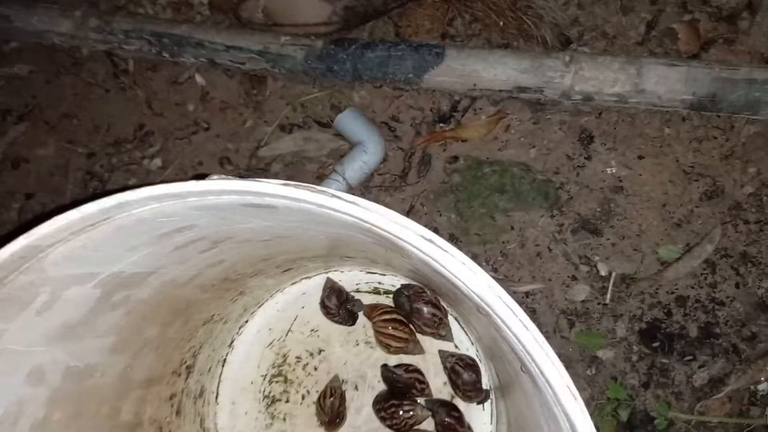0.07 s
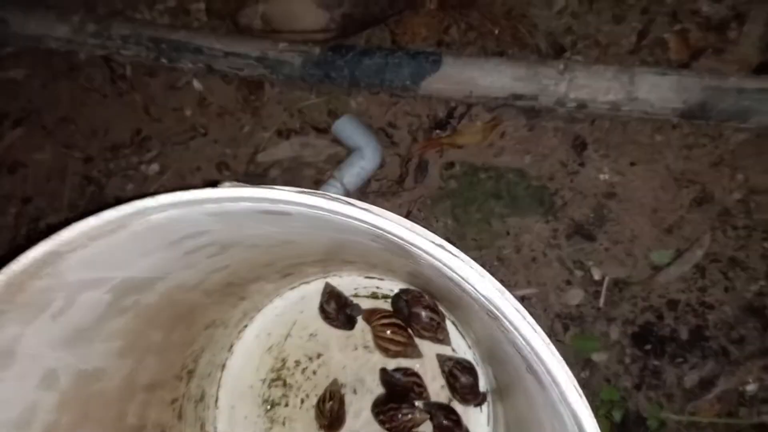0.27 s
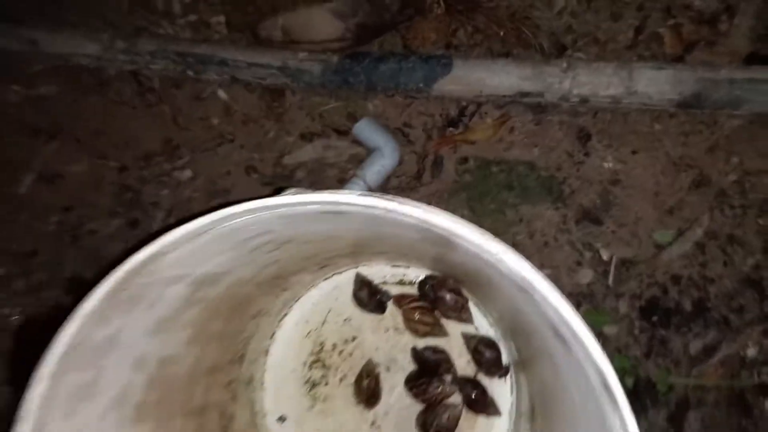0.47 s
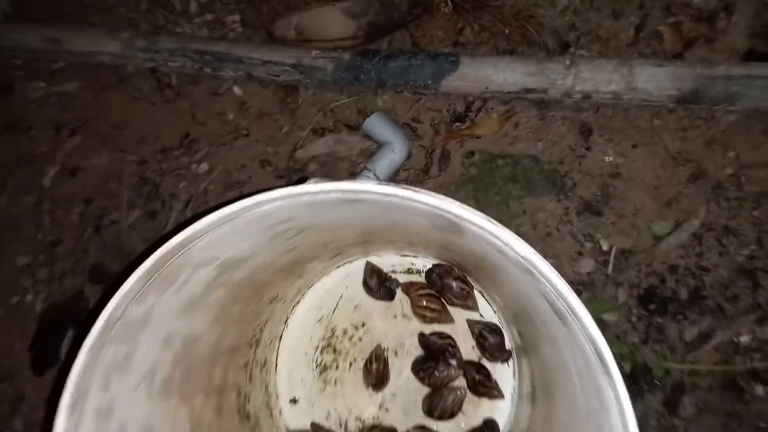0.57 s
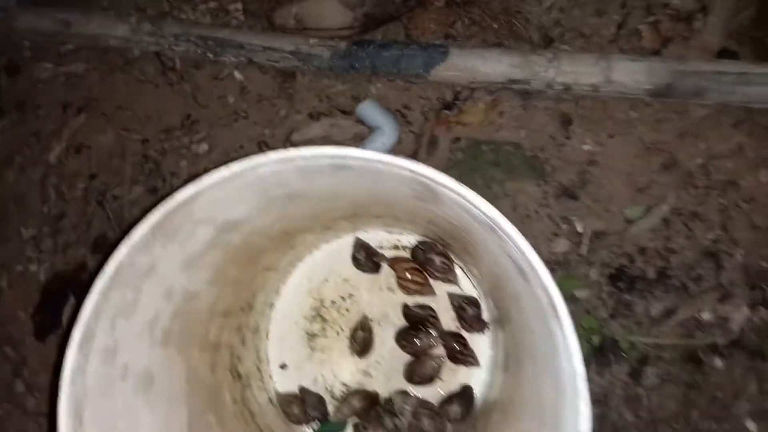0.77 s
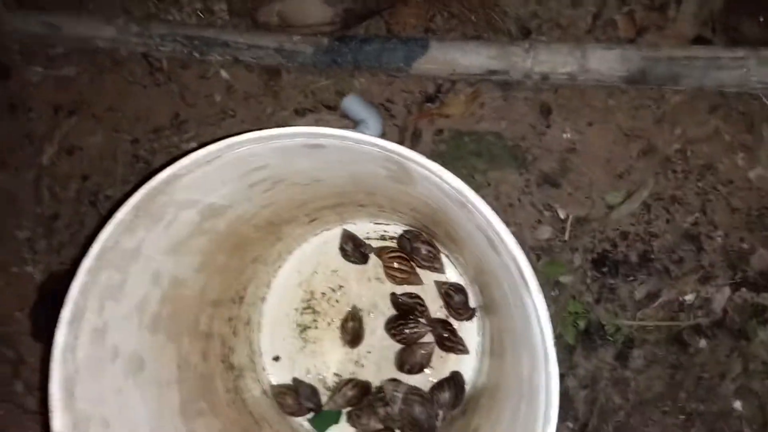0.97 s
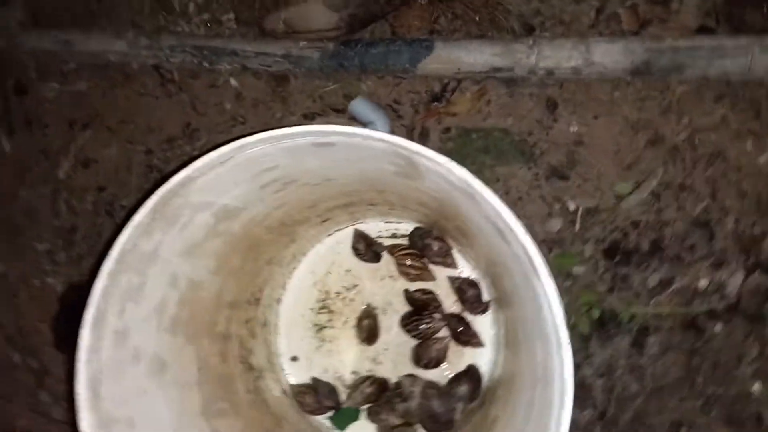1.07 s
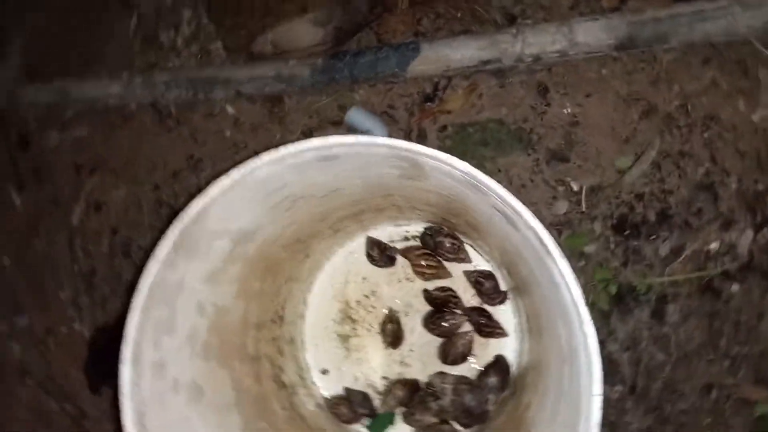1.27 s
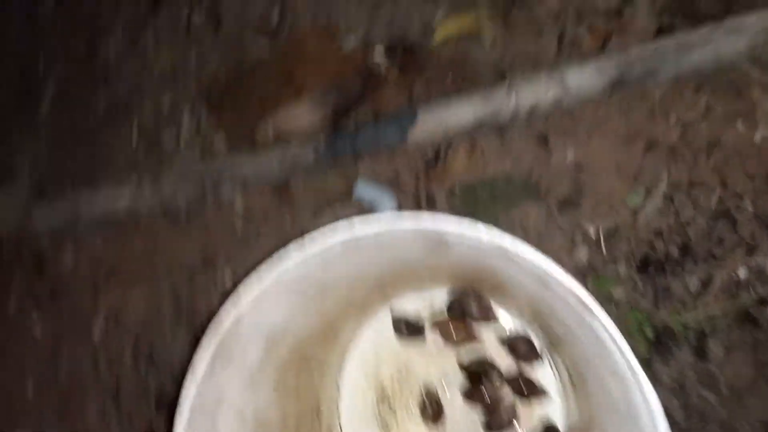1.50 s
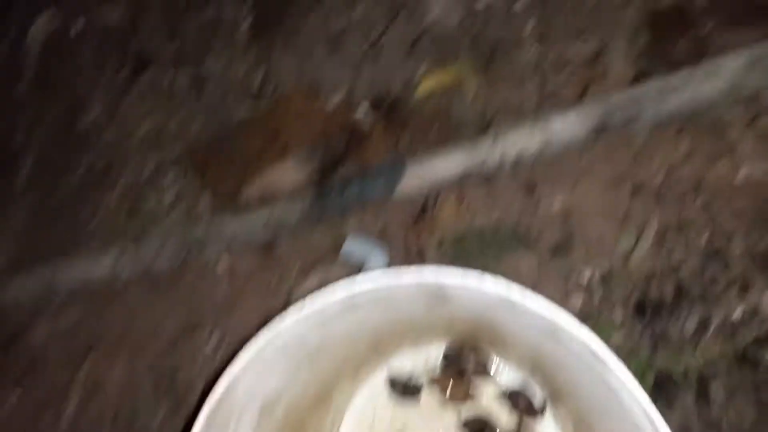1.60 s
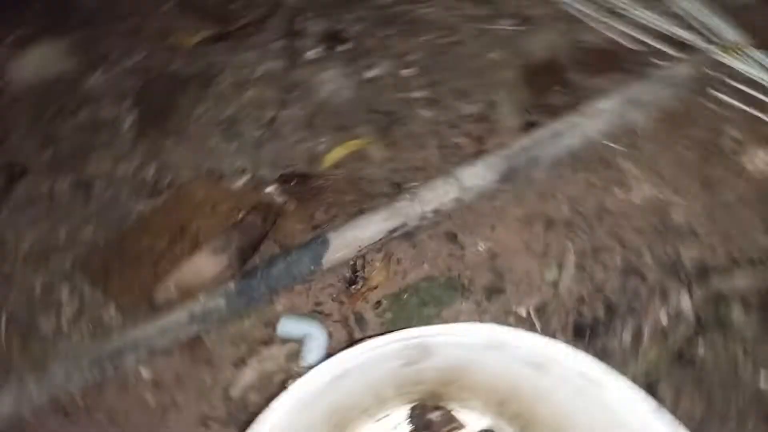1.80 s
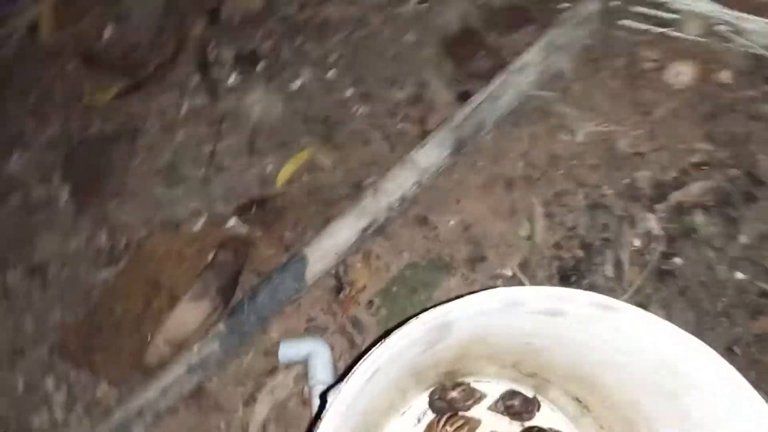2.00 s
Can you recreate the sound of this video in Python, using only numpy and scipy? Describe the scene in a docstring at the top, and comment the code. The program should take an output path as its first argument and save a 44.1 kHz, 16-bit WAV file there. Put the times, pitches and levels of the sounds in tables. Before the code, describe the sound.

Quiet garden at night with high crickets and faint hiss; early on a hard shell knocks and rebounds inside a hollow plastic bucket, loud and close, followed by small clicks and light scuffs of feet on soil.

```python
"""A garden at night: crickets of several kinds, wings rung by strokes, chirp and trill all through over
hiss and a faint low rumble. Feet scuff the soil at the start, under very faint low booms. Then a snail
shell drops into a plastic bucket and bounces: noise rings the wall in clacks and the air inside booms
as swelling, dying sines. Further scuffs of feet and shells follow to the end, with small ticks of
shells and twigs, dying puffs of noise, among them."""
import sys
import numpy as np
from scipy import signal
from scipy.fft import rfft, irfft
from scipy.io import wavfile
from scipy.ndimage import uniform_filter1d

SR = 44100
rng = np.random.default_rng(int(sys.argv[2]) if len(sys.argv) > 2 else 0)


def volts_from_db(level):
    """Convert decibel levels to linear amplitude ratios."""
    exponent = np.asarray(level, float) / 20
    return 10 ** exponent


def transcribe(u):
    """Save the signal u as a 16-bit wav file named by the first command-line argument.

    u: samples, shape (n,) or (channels, n), limited to [-1, 1]; the rate is SR.
    q: integer samples, one column per channel.
    """
    v = np.clip(np.atleast_2d(u).T, -1, 1)
    q = np.round(v * 32767).astype(np.int16)
    wavfile.write(sys.argv[1], SR, q)


N = 90404  # length in samples

# In every table pan is left over right.
# Shell meets bucket wall: t/s, wall level/dB, crack level/dB, shell ring f/Hz, shell level/dB,
# chatter decay/s, pan/dB
BOUNCES = [(.2328, -15, -23.5, 1840, -14.5, 0.0066, -2.5), (.2375, -17.5, -27, 900, -19, 0.0039, -2.5),
           (.2785, -16, -45, 2000, -31.5, 0.0033, -3), (.3397, -10.5, -22.5, 2980, -15.5, 0.003, -2),
           (.3802, -11, -27.5, 2220, -7, 0.0022, -4.5), (.4064, -21.5, -42, 1670, -18.5, 0.002, 1.5),
           (.4532, -32.5, -37, 900, -32, 0.0016, -2.5), (0.464, -37, -53.5, 2100, -42, 0.0023, -8)]
# Crowded wall modes by band: f/Hz, level/dB relative to the blow, t60/s
WALL_MODES = [(400, -21.5, 0.24), (657.5, -4, 0.1), (900, 1, .09), (1250, -6, 0.099), (1600, -3, 0.094),
              (2100, 0.5, 0.078), (2454, -2, 0.057), (3300, -2, 0.055), (4280, -18, 0.019),
              (5800, -25.5, .02), (7500, -21, 0.028), (9300, -17, .012), (12000, -23, .012),
              (14500, -21, .012)]
# Low booms of the air column: t/s, level/dB before a common lift, f/Hz
BOOMS = [(.002, -47, 219), (.05, -55, 217), (0.089, -60, 220), (.2332, -9, 207), (0.2782, -20, 224),
         (0.3375, -24.5, 207), (0.379, -11.5, 217.7), (0.4044, -24.5, 212.3), (.453, -42, 210),
         (0.468, -50.5, 218), (0.492, -40.5, 226.6), (0.521, -48, 216), (.575, -60.5, 220)]
# Small ticks of shells and twigs: t/s, starting level/dB, f/Hz, width/share of f, t60/s, pan/dB
TICKS = [(1.1074, -39.5, 2500, 0.095, 0.026, -12), (1.110, -37.5, 2537, 0.48, 0.0073, -17),
         (1.109, -37.5, 7920, 0.36, .006, 2.5), (1.137, -44, 4500, 1, 0.0057, -4),
         (1.121, -41.5, 2000, 0.61, 0.014, -11), (1.130, -47, 2200, .3, 0.017, -15),
         (1.136, -29.5, 1600, 0.39, 0.011, -7.5), (1.142, -53.5, 1526, 0.46, 0.07, -4),
         (.533, -30.5, 8500, 0.091, 0.0165, 11), (0.532, -46, 1400, 0.53, 0.14, -4.5),
         (0.538, -36.5, 5700, 0.74, 0.047, -3), (0.549, -41.5, 8100, 0.57, 0.045, 5),
         (1.838, -35, 10850, 0.51, 0.0051, 1), (2.02, -44, 4340, 0.083, 0.027, 0.5)]
# Scuffs of feet and shells: start t/s, length/s, level/dB, centre f/Hz, width/octaves, pan/dB
SCUFFS = [(-.02, 0.16, -57, 1600, 1.95, -4.5), (0.433, 0.084, -50, 1210, 3.6, -5),
          (0.528, 0.053, -55.5, 1600, 2.5, 5), (0.621, .07, -66, 9030, 0.67, 7),
          (.772, 0.05, -51, 2260, 0.24, -12.5), (0.791, 0.097, -49, 3300, 0.32, -6.5),
          (0.777, 0.14, -60.5, 1896, 1.44, -7), (0.811, 0.079, -60.5, 13240, 0.45, 2),
          (0.833, 0.042, -57, 1450, 0.95, -8), (0.829, 0.045, -65, 230, 0.52, 1),
          (0.87, 0.13, -64.5, 2190, .9, -13), (1.025, 0.12, -60, 2580, 1.15, -10),
          (1.68, 0.17, -60.5, 2000, 1.15, -6.5), (1.803, 0.18, -56.5, 2547, 1.16, -7),
          (1.68, 0.39, -65, 11000, 1.02, 0.7), (1.803, .14, -65, 140, 1.47, 2.5)]
# Cricket choirs: low f/Hz, high f/Hz, level/dB, nominal chirp depth/dB, pan/dB,
# nominal wing pulses/per s, wing ring t60/cycles
CHOIRS = [(2037, 2280, -66, -1, -12, 95, 30), (3805, 4400, -57.5, 6, -3, 72, 200),
          (4694, 5160, -53.5, 9, 2.5, 110, 220), (6690, 7250, -59.5, 0, 5, 112, 170),
          (7270, 7850, -61, 15, 0.5, 46, 150)]
# Chirping of each choir, in the same order: chirps/per s, t/s of one chirp peak
CHIRPS = [(4.5, .9), (4.52, .78), (4.42, .918), (4.5, .8), (9.05, .874)]
# Shared gain of all choirs as the listener turns: t/s, level/dB
CHOIR_GAIN = [(0, 2), (.12, 5), (.17, 0.5), (.4, 0.9), (.8, -1.5), (1.1, -2.5), (1.45, -3), (1.6, -1.5),
              (1.85, 2.5), (2.05, 1)]
# Colour of the night hiss: f/Hz, relative level/dB
HISS_COLOUR = [(30, -23), (55, -10.5), (100, -8.5), (214, -9), (410, -22.5), (1730, -28.5), (2300, -17),
               (3140, -13), (4500, -11), (5300, -20), (5600, -19.5), (6300, -15.5), (8300, -13),
               (9500, -18), (11900, -28), (15500, -21), (16600, -30)]
# Treble of the hiss, used relative to its mean: t/s, level/dB
HISS_TREBLE = [(0.0, -66), (0.12, -67.5), (0.3, -68), (0.4, -60), (0.47, -62.5), (0.64, -68.5),
               (1.21, -75.5), (1.4, -77), (1.53, -70), (1.83, -68), (1.96, -74.5), (2.05, -73)]
# Low rumble: t/s, level/dB before a small trim
RUMBLE_LEVEL = [(0, -55.5), (.12, -71), (.2, -68), (.4, -56.5), (.6, -68.5), (1.0, -77), (1.5, -76),
                (1.85, -77), (2.05, -65.5)]


def rms_one(x):
    """Scale to rms 1."""
    return x / np.sqrt(np.mean(x ** 2) + 1e-20)


def curve(rows):
    """Join (t/s, value) rows by straight lines."""
    return np.interp(np.arange(N) / SR, *np.transpose(rows))


def ring(clicks, hz, t60):
    """A resonator: a unit click sets a dying sine of height about 1 ringing."""
    r, w = volts_from_db(-60 / (t60 * SR)), 2 * np.pi * hz / SR
    return signal.lfilter([0, np.sin(w)], [1, -2 * r * np.cos(w), r * r], clicks + 1e-18)


def band(x, low, high):
    """Band-pass between two frequencies in Hz."""
    return signal.sosfilt(signal.butter(2, [low, high], "band", fs=SR, output="sos"), x)


def grains(per_s, spread_db, shape):
    """Random clicks of uneven size and sign."""
    size_db = spread_db * np.minimum(rng.exponential(1, shape), 4)
    sizes = volts_from_db(size_db) * rng.choice([-1, 1], shape)
    return sizes * (rng.random(shape) < per_s / SR)


def stereo(pair, alike, pan_db):
    """Mix a shared and an opposed signal to left and right, then pan."""
    shared = np.sqrt(1 + alike) * pair[0]
    opposed = np.sqrt(1 - alike) * pair[1] * [[1], [-1]]
    return (shared + opposed) * volts_from_db(np.array([[pan_db / 2], [-pan_db / 2]]))


def clacks():
    """Each bounce cracks and chatters: the shell rings briefly, the wall's modes die band by band."""
    crack_decay_s, shell_width = 0.00087, 0.18  # width as share of pitch
    tail_db, alike = -9, 0.24  # the wall's ringing tail against the chatter; likeness of the sides
    out, u = np.zeros((2, N)), np.arange(int(.2 * SR)) / SR
    for s, wall_db, crack_db, shell_hz, shell_db, chatter_s, pan_db in BOUNCES:
        start = int(s * SR)
        here = out[:, start:start + len(u)]  # a view: adding here adds to out
        chatter = rms_one(grains(5400, 1.7, (2, len(u)))) * np.exp(-u / chatter_s)
        noises = rng.standard_normal((2, 2, len(u)))

        crack = band(noises[0] * np.exp(-u / crack_decay_s), 900, 15000)
        here += volts_from_db(crack_db) * stereo(crack, alike, 3.5)

        shell = band(chatter, shell_hz * (1 - shell_width), shell_hz * (1 + shell_width))
        shell = shell * np.sqrt(SR / shell_hz / 4)  # makes up for the narrower band at low pitch
        here += volts_from_db(shell_db) * stereo(shell, alike, pan_db)

        for k, (hz, band_db, t60) in enumerate(WALL_MODES):
            tail = volts_from_db(tail_db - 60 * u / t60) * noises[k % 2]
            shake = band(chatter + tail, hz / 1.138, hz * 1.111) * np.sqrt(SR / hz / 4)
            level_db = wall_db + band_db
            if hz > 5000:  # a blow with a weak crack leaves the wall's treble quiet
                level_db += 0.5 * (crack_db - wall_db + 10.5)
            lean_db = 4.5 * abs(np.log2(hz / 2200))  # leans left per octave away from 2200 Hz
            here += volts_from_db(level_db) * stereo(shake, alike, pan_db + lean_db)
    return out


def boom():
    """Low booms, each swelling and ringing as a dying sine, and fading quickly when the next begins."""
    t60, delay_s, swell_s, quick_fade_s = 0.13, 0.0038, 0.0036, 0.0033
    lift_db, pan_db = 9, 3
    t, out = np.arange(N) / SR, np.zeros(N)
    next_starts = [row[0] for row in BOOMS[1:]] + [9]  # the last rings on to the end
    for (s, db, hz), end in zip(BOOMS, next_starts):
        u = np.maximum(t - s - delay_s, 0)
        swell = 1 - np.exp(-u / swell_s)
        quick_fade = np.exp(-np.maximum(t - end - delay_s, 0) / quick_fade_s)
        out -= volts_from_db(db + lift_db - 60 * u / t60) * swell * quick_fade * np.sin(2 * np.pi * hz * u)
    return out * volts_from_db([[pan_db / 2], [-pan_db / 2]])


def ticks():
    """Small ticks of shells and twigs: each is a dying puff of noise round one pitch."""
    out, u = np.zeros((2, N + SR)), np.arange(SR // 20) / SR
    for s, db, hz, width, t60, pan_db in TICKS:
        puff = band(rng.standard_normal((2, len(u))), hz * (1 - min(width, .9)), hz * (1 + width))
        envelope = volts_from_db(db - 60 * u / t60) * (1 - np.exp(-u / 0.00029))
        start = int(s * SR)
        out[:, start:start + len(u)] += envelope * stereo(rms_one(puff), 0.21, pan_db)
    return out[:, :N]


def scuffs():
    """Friction as dense, clumped grit under a stroke that rises fast and fades."""
    attack_share, fade_share, fade_power = 0.11, .6, .8  # shares of the stroke's length
    clump_db, grains_per_s = 1.5, 2700
    t, out = np.arange(N) / SR, 0
    for s, length, db, hz, octaves, pan_db in SCUFFS:
        u = (t - s) / length
        fade = np.clip((1 - u) / fade_share, 0, 1) ** fade_power
        stroke = np.clip(u / attack_share, 0, 1) * fade
        clumps = uniform_filter1d(rng.standard_normal(N), size=300) * np.sqrt(300)
        grit = volts_from_db(clump_db * clumps) * grains(grains_per_s, 1.98, (2, N))
        grit = band(grit, hz * 2 ** (-octaves / 2), hz * 2 ** (octaves / 2))
        out = out + volts_from_db(db) * stroke * stereo(rms_one(grit) / np.sqrt(2), 0.33, pan_db)
    return out


def crickets():
    """Each choir is five wings a little apart in pitch, rung by uneven pulses, sharing one chirp swell."""
    strokes_per_s, stroke_spread_db, pulse_depth, alike = 900, 2, .6, 0.15
    t, out = np.arange(N) / SR, 0
    for choir, (chirps_per_s, peak_s) in zip(CHOIRS, CHIRPS):
        low, high, db, depth_db, pan_db, pulses_per_s, cycles = choir
        wings = 0
        for hz in np.linspace(low, high, num=5):
            turns = pulses_per_s * t * rng.uniform(0.96, 1.05) + rng.random()
            pulses = 1 + pulse_depth * np.cos(2 * np.pi * turns)
            strokes = pulses ** 2 * grains(strokes_per_s, stroke_spread_db, (2, N))
            wings = wings + ring(strokes, hz, cycles / hz)
        for _ in range(2):  # twice for steep edges
            wings = band(wings, low * 0.969, high * 1.03)
        swell = np.tanh(1.5 * np.cos(2 * np.pi * chirps_per_s * (t - peak_s))) / 2
        out = out + volts_from_db(db + depth_db * swell) * stereo(rms_one(wings) / np.sqrt(2), alike, pan_db)
    return out * volts_from_db(curve(CHOIR_GAIN))


def night_hiss():
    """Smooth coloured noise whose treble comes and goes."""
    hz, db = np.transpose(HISS_COLOUR)
    colour = volts_from_db(np.interp(np.log(np.fft.rfftfreq(N, 1 / SR) + 1), np.log(hz), db))
    hiss = rms_one(irfft(rfft(rng.standard_normal((2, N))) * colour, N))
    treble_db = curve(HISS_TREBLE)
    hiss = hiss + band(hiss, 6800, 14000) * (volts_from_db(treble_db - treble_db.mean()) - 1)
    return volts_from_db(-62.5) * stereo(hiss, 0.37, 0.59)


def rumble():
    """A far low rumble: noise in a narrow band round 73 Hz, the same on both sides but for the pan."""
    low = rms_one(band(rng.standard_normal((2, N)), 73 - 16, 73 + 16))
    return volts_from_db(curve(RUMBLE_LEVEL) - 0.5) * stereo(low, 1.0, 2.5)


def scene():
    """Bucket, ticks and scuffs over crickets and night air."""
    return clacks() + boom() + ticks() + scuffs() + crickets() + night_hiss() + rumble()


def low_pass(x):
    """Removes everything above the highest recorded frequency."""
    return signal.sosfilt(signal.butter(12, 16610, fs=SR, output="sos"), x)


def record(dry):
    """Round the peaks softly, then cut the top of the spectrum."""
    ceiling = 1.6
    rounded = ceiling * np.tanh(dry / ceiling)
    top_cut = signal.cheby2(10, 60, 16700, fs=SR, output="sos")  # 60 dB down from 16700 Hz
    mix = signal.sosfilt(top_cut, rounded)
    return low_pass(mix)


dry = scene()
out = record(dry)
transcribe(out)
```